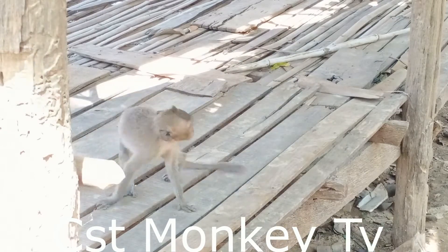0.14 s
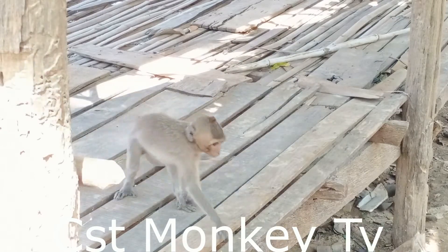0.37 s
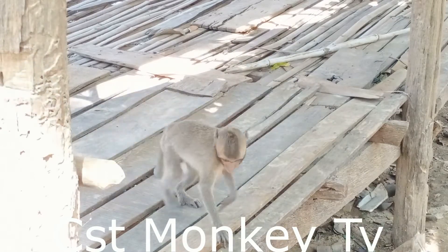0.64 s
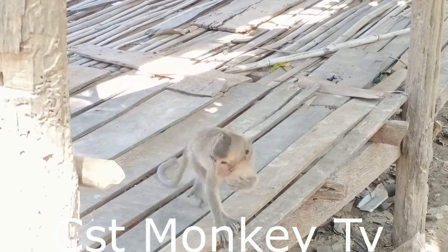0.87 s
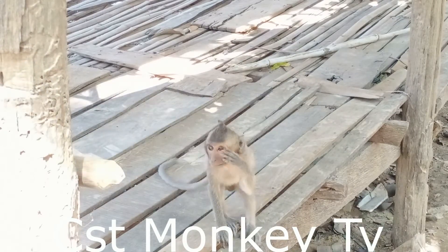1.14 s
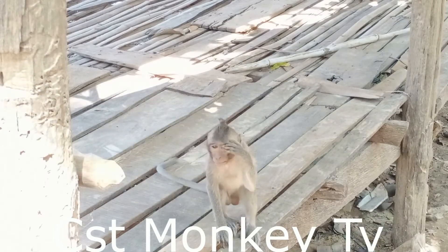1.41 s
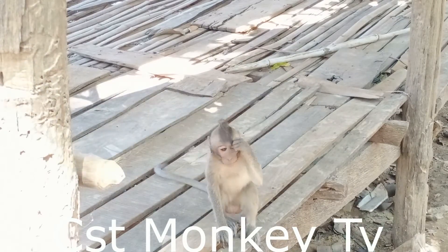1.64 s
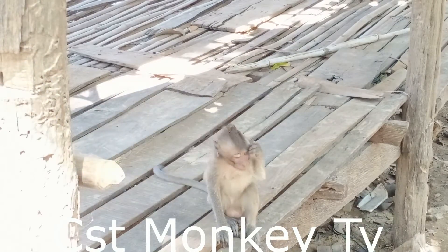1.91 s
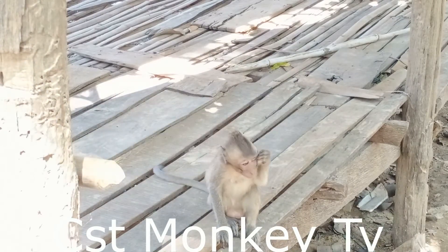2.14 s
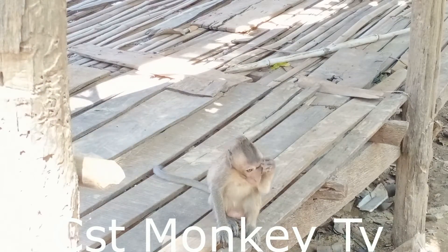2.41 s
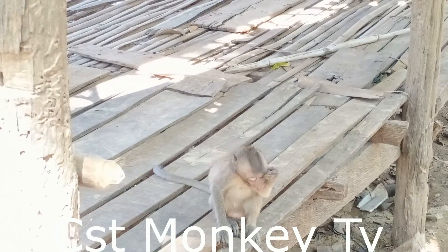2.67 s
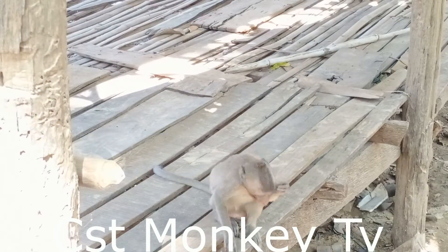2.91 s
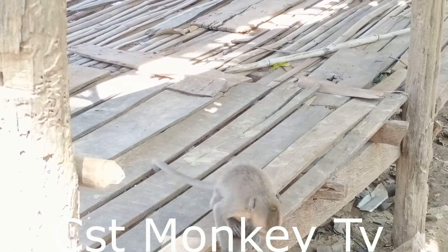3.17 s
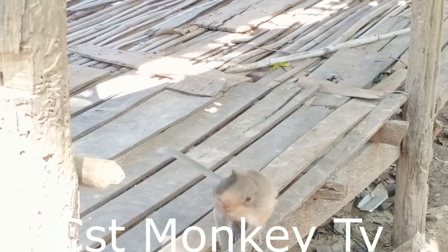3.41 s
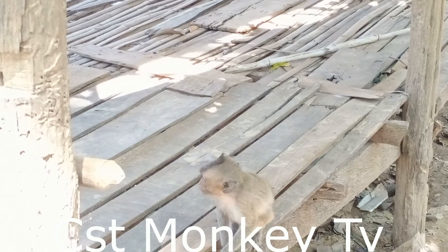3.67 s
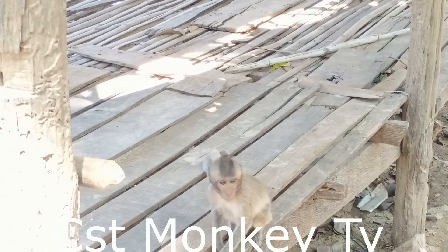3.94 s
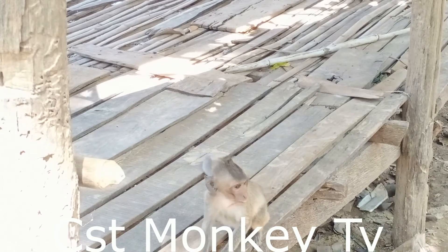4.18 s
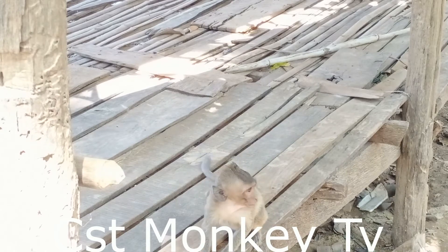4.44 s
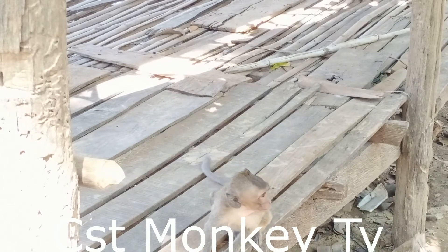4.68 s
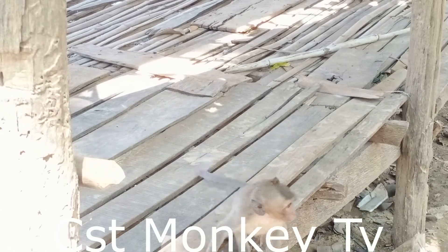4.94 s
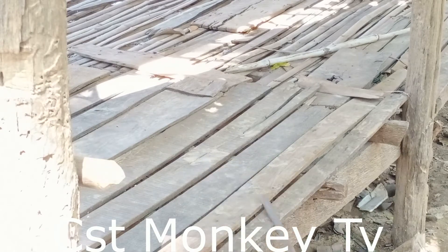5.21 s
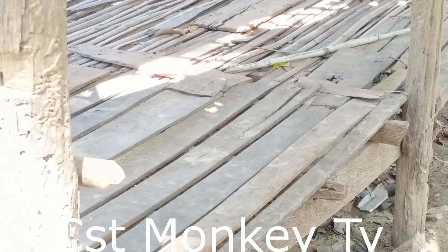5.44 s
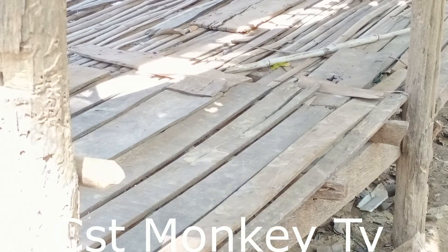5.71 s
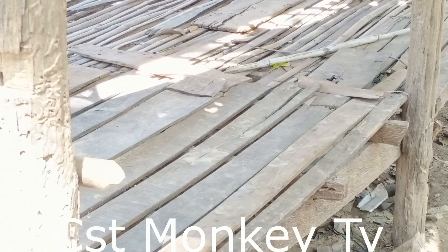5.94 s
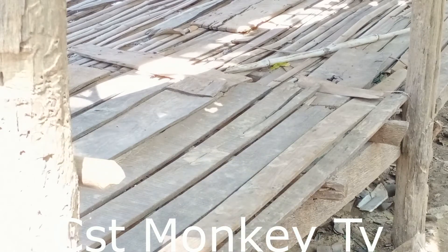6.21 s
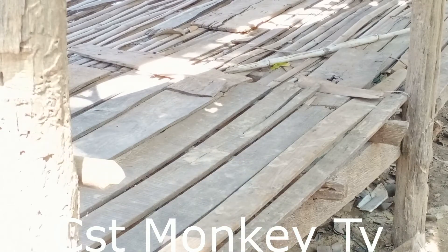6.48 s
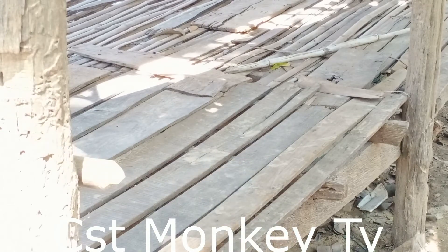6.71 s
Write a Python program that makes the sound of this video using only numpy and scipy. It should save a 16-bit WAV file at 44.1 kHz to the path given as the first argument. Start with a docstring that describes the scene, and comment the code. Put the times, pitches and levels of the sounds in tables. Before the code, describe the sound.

Light claws and fur brush over dry litter on wooden boards in uneven crackling bursts, mixed with short scrapes and small cracks. The middle is quieter and fidgety; a cluster of harder clicks and rocking boards follows at about five seconds, then sparse faint rustles. Dry open-air sound in mono, with soft wind rumble and slightly muted background hiss.

```python
"""A small monkey shuffles over loose, dry planks strewn with litter, under an open shed roof.
Claws and fur crackle as uneven noise bursts; scrapes and rocking boards are slips ringing tuned modes.
Taps are short cracks with a scattered tail and a board ring; light wind rumbles on the microphone
as lumpy low noise over a faint, steady outdoor hiss, and the recorder suppresses quiet bands."""
import sys
import numpy as np
from scipy import signal
from scipy.fft import rfft, irfft, next_fast_len
from scipy.io import wavfile
from scipy.ndimage import uniform_filter1d

SR = 44100
rng = np.random.default_rng(int(sys.argv[2]) if len(sys.argv) > 2 else 0)


def field_ratio(decibels):
    """Amplitude ratio for a level in dB (20 dB per decade); scalars and array-likes work."""
    return 10 ** (np.asarray(decibels, dtype=float) / 20)


def file_out(sig):
    """Save sig as 16-bit WAV at sys.argv[1]."""
    # one column per channel
    cols = np.atleast_2d(sig).T
    # limit, then scale
    lim = np.clip(cols, -1, 1)
    pcm = np.round(lim * 32767).astype(np.int16)
    wavfile.write(sys.argv[1], SR, pcm)


N = 301950

# Claws and fur moving over dry litter. Each row: start in seconds, length in seconds, crackle level in dB,
# treble against crackle in dB.
MOVES = [(0.0, 0.016, -50, -15), (0.038, .04, -55, -18), (0.078, 0.05, -43, -12), (0.16, 0.039, -52.5, -19),
         (0.222, 0.12, -49.5, -13.5), (0.412, 0.06, -52.5, -23), (0.49, 0.03, -45.5, -16.5),
         (0.546, 0.091, -54, -21), (0.651, 0.091, -53.5, -26), (0.857, 0.05, -67, -28),
         (0.936, .09, -54.5, -23), (1.014, 0.11, -51, -14), (1.143, 0.097, -56, -20),
         (1.29, 0.094, -47.5, -21), (1.411, 0.12, -48, -15.5), (1.654, 0.23, -49.5, -20.5),
         (1.981, 0.13, -50.5, -20), (2.13, 0.072, -49.5, -25), (2.266, 0.037, -48.5, -20),
         (2.334, 0.25, -46, -16.5), (2.699, 0.22, -48.5, -21.5), (2.972, 0.1, -49.5, -22),
         (3.097, .11, -50.5, -19), (3.321, 0.14, -48.5, -26), (3.568, 0.05, -48, -18),
         (3.63, .06, -58.5, -38), (3.845, 0.026, -55.5, -15), (3.934, 0.021, -49, -17.5),
         (3.996, 0.12, -51, -21), (4.108, 0.045, -51, -17), (4.176, 0.084, -55.5, -34),
         (4.414, 0.083, -51.5, -23), (4.53, 0.17, -50.5, -24), (4.733, 0.026, -51, -19),
         (4.915, 0.12, -49.5, -32), (4.994, 0.025, -43, -19), (5.08, 0.076, -46.5, -24),
         (5.2, 0.013, -36.5, -33), (5.206, 0.025, -44, -23), (5.251, 0.12, -46, -21),
         (5.431, .025, -49, -23), (5.463, 0.0071, -41.5, -9), (5.5, 0.13, -47.5, -16),
         (5.694, .36, -48.5, -23), (6.098, 0.13, -53, -19.5), (6.25, .16, -52, -21),
         (6.464, 0.17, -53.5, -21.5), (6.7, 0.04, -50, -18), (6.774, .1, -50, -20)]
MOVE_ATTACK_DB_PER_S, MOVE_SAG_DB_PER_S, MOVE_RELEASE_DB_PER_S = 797, 8, 244
REST_CRACKLE_DB, REST_TREBLE_REL_DB = -61, -30  # small stirrings between the moves
# Feet dragging on the boards. Each row: start in seconds, length in seconds, level in dB,
# pitch of the scraped spot in Hz.
SCRAPES = [(0.0, .05, -56.5, 1900), (0.07, 0.059, -47.5, 2200), (0.22, 0.021, -49.5, 1660),
           (0.26, 0.12, -56.5, 1100), (0.47, .06, -48.5, 1570), (0.55, .15, -55, 1100),
           (0.96, .17, -54.5, 1710), (1.29, 0.093, -50, 1770), (1.38, 0.045, -57, 1740),
           (1.47, 0.04, -54, 2210), (1.67, 0.036, -52.5, 1830), (1.76, 0.076, -53.5, 1530),
           (2.04, 0.12, -61.5, 1690), (2.135, 0.052, -55, 1640), (2.27, .06, -53, 2050),
           (2.43, .025, -43.5, 1640), (2.4, 0.027, -56, 1310), (2.48, 0.11, -53.5, 1440),
           (2.71, 0.23, -61.5, 1670), (3.03, .2, -67.5, 1410), (3.33, 0.11, -57.5, 1960),
           (3.54, 0.087, -57.5, 1260), (3.84, 0.01, -75, 2200), (3.92, 0.2, -60.5, 1730),
           (4.095, 0.038, -51.5, 1840), (4.42, 0.044, -62, 1660), (4.55, 0.094, -64, 2150),
           (4.73, 0.019, -59, 1730), (4.9, 0.099, -59, 1400), (5.0, 0.036, -52, 1420),
           (5.11, 0.036, -53.5, 1950), (5.195, 0.069, -46, 2450), (5.27, 0.085, -51, 1240),
           (5.433, 0.0057, -52.5, 2370), (5.468, 0.013, -45, 1640), (5.5, 0.066, -69, 1610),
           (5.595, 0.01, -56, 2660), (5.69, 0.036, -62.5, 1330), (5.93, 0.25, -63.5, 1770),
           (6.23, 0.0087, -61, 2940), (6.29, 0.23, -64, 1600), (6.715, 0.024, -53, 3200),
           (6.82, .05, -65.5, 2600)]
SCRAPE_ATTACK_DB_PER_S, SCRAPE_SAG_DB_PER_S, SCRAPE_RELEASE_DB_PER_S = 617, 30, 325
# Weight rocking a loose board. Each row: start in seconds, length in seconds, level in dB,
# pitch of the board in Hz.
ROCKS = [(0.48, 0.029, -73, 860), (0.64, 0.037, -73, 714), (1.32, 0.034, -61, 837), (1.46, .03, -85, 876),
         (2.0, 0.065, -70, 555), (2.25, 0.083, -67, 766), (2.43, 0.07, -63, 740), (3.55, 0.032, -66.5, 837),
         (3.61, 0.027, -60.5, 495), (3.645, 0.077, -66.5, 495), (4.095, .06, -67, 938),
         (4.91, 0.043, -62, 676), (5.005, 0.026, -53.5, 415), (5.06, 0.064, -58.5, 335),
         (5.155, .05, -60.5, 650), (5.21, .07, -62, 837), (5.29, 0.034, -54.5, 970),
         (5.34, 0.029, -52.5, 495), (5.37, 0.047, -53.5, 407), (5.44, 0.064, -57, 880),
         (6.72, 0.053, -64.5, 560)]
ROCK_ATTACK_DB_PER_S, ROCK_SAG_DB_PER_S, ROCK_RELEASE_DB_PER_S = 608, 36, 364
# Taps of claws and litter. Each row: start in seconds, relative level in dB, resonance of the crack in Hz,
# relative board ring in dB, pitch of the struck spot in Hz.
TAPS = [(0.0651, -38, 5300, -10, 1640), (0.084, -33.5, 5300, -5.5, 2920), (0.107, -25.5, 5570, -20, 2040),
        (0.2202, -24.5, 6200, -14.5, 1480), (0.2344, -26, 5530, -37, 2890),
        (0.2529, -29, 6260, -11.5, 1480), (0.3163, -30, 5800, -25, 1260), (0.4861, -33, 4700, -8, 2570),
        (0.6535, -31.5, 5000, -19.5, 1100), (1.28, -38.5, 4350, -29, 1730),
        (1.2985, -32, 5140, -11.5, 1620), (1.339, -34, 5630, -2, 1830), (1.4105, -27.5, 5600, -26, 1620),
        (1.474, -27.5, 4930, -17, 1850), (1.6188, -32, 6700, -32, 1370), (1.653, -50, 5300, -22, 1750),
        (1.6766, -30, 4550, -18, 1580), (1.864, -48.5, 5640, -6, 1360), (1.9772, -36.5, 5400, -27, 1330),
        (2.1387, -26, 4300, -33, 1640), (2.1871, -32.5, 3580, -42, 1470), (2.2486, -43, 6590, -11, 2070),
        (2.4114, -27, 3620, -30, 1380), (2.4341, -24, 3350, -9, 1770), (2.4897, -27.5, 5400, -17, 1330),
        (2.5333, -30, 3950, -15, 2680), (2.7036, -34, 4630, -27, 1680), (2.9153, -37, 4800, -18, 2850),
        (2.984, -43.5, 4600, -6, 2850), (3.1023, -38, 4860, -23, 2400), (3.3223, -38.5, 5900, -9, 1760),
        (3.5615, -36, 5800, -10, 1280), (3.612, -34, 5000, -29, 1300), (3.8442, -34, 4970, -15, 2150),
        (3.935, -30.5, 4170, -19.5, 1700), (4.0919, -21.5, 4150, -19, 1650),
        (4.2305, -35.5, 4600, -18.5, 1310), (4.5297, -36, 4470, -13, 2180), (4.62, -33, 4800, -16, 2280),
        (4.736, -29, 4550, -22.5, 1320), (4.9005, -27, 5330, -16, 1570), (5, -23, 6800, -19.5, 1360),
        (5.1244, -26.5, 3870, -12, 2570), (5.192, -24, 4000, -24, 2970), (5.196, -18, 3970, -20.5, 2280),
        (5.4317, -17.5, 3730, -11, 2480), (5.463, -23.5, 7100, -18, 1320), (5.471, -16.5, 3850, -18, 1380),
        (5.5984, -29.5, 6660, -15.5, 2640), (5.734, -45, 5750, -5.5, 1330), (5.9339, -32, 3900, -33, 1820),
        (6.2954, -34.5, 6900, -25, 1300), (6.6203, -35.5, 6900, -21, 1030), (6.6973, -26, 4400, -27, 1400),
        (6.7228, -32.5, 3400, -17, 1370)]
TAP_TAIL_DB = -8  # scattering litter against the crack, before the taps are coloured
# Nominal board modes. Each row: frequency in Hz, relative level in dB, t60 in seconds.
BOARD_MODES = [(224, -12.5, 0.066), (335, -4.5, 0.089), (407, -4.5, 0.038), (495, -2, 0.43), (555, -3, .15),
               (650, -7.5, 0.11), (740, 2, 0.076), (837, 1.5, 0.42), (938, -0.5, 0.12), (1100, -4.5, 0.18),
               (1226, -3, 0.039), (1313, 3.5, 0.058), (1480, -3, 0.078), (1640, -1.5, 0.097),
               (1850, -4, 0.022), (2099, -1, 0.038), (2308, -3.5, 0.078), (2570, 1.5, 0.037),
               (2850, 4.5, 0.13), (3055, 7.5, 0.02), (3400, 12, 0.031)]
# Puffs of wind on the microphone. Each row: start in seconds, length in seconds, level in dB.
PUFFS = [(0.0, .06, -67.5), (0.21, 0.11, -64), (0.51, 0.036, -72), (0.72, 0.14, -57.5), (1.1, 0.082, -61.5),
         (1.7, 0.15, -69), (2.14, 0.11, -68.5), (2.59, 0.12, -65.5), (2.87, 0.024, -75), (3.25, .15, -71.5),
         (3.65, 0.06, -60.5), (3.95, 0.086, -72), (4.19, .04, -69.5), (4.85, .05, -61.5),
         (5.42, 0.043, -57), (6.06, .13, -62.5)]
PUFF_ATTACK_DB_PER_S, PUFF_RELEASE_DB_PER_S, BREEZE_DB = 165, 210, -73
# Spectra of crackle, its treble, taps, wind and outdoor hiss. Each row: frequency in Hz,
# relative density in dB per Hz.
CRACKLE_SPECTRUM = [(1650, -26.5), (2800, -21.5), (3160, -12), (3950, 0.5), (5940, -1.5), (6780, -1.5),
                    (8750, -21), (9400, -57), (10500, -59), (13600, -70), (22000, -120)]
TREBLE_SPECTRUM = [(5880, -38), (10000, -9.5), (11400, -10.5), (12300, -1), (14900, 4.5), (16000, -30)]
TAP_SPECTRUM = [(1530, -29), (2600, -13), (3360, -10.5), (4180, -6), (6180, -7.5), (6860, -1.5),
                (9340, -29.5), (11800, -21.5), (14700, -13), (15700, 11)]
WIND_SPECTRUM = [(15, -68), (25, -26), (75, 5.5), (110, -1), (183, -20.5), (200, -46), (260, -89),
                 (440, -120)]
AIR_SPECTRUM = [(53, -41), (90, 1), (532, -12), (1290, -8.5), (2530, -15.5), (3290, -16), (4450, -2.5),
                (6580, 4.5), (8000, -9), (9310, -39), (12900, -30.5), (15000, -29), (16000, -32)]


def shuffle():
    """The same breaks give the crackle, its treble and the contact noise; slips drive the upper board modes."""
    moves = spells(MOVES, MOVE_ATTACK_DB_PER_S, MOVE_SAG_DB_PER_S, MOVE_RELEASE_DB_PER_S)
    treble_rel_db = np.array(MOVES)[:, 3:]
    crackle_gain = together(moves, REST_CRACKLE_DB)
    treble_gain = together(moves * field_ratio(treble_rel_db), REST_CRACKLE_DB + REST_TREBLE_REL_DB)
    grain = snaps(per_s=160, spread_db=2.0, t60_s=0.05, smooth=0.81)
    crackle = crackle_gain * colour(grain, CRACKLE_SPECTRUM)
    treble = treble_gain * colour(grain, TREBLE_SPECTRUM)

    drags = spells(SCRAPES, SCRAPE_ATTACK_DB_PER_S, SCRAPE_SAG_DB_PER_S, SCRAPE_RELEASE_DB_PER_S)
    drag_gain, pitch_hz = level_and_pitch(SCRAPES, drags, rest_db=-72)
    contact_band = signal.butter(4, [1020, 3700], "band", fs=SR, output="sos")
    contact = rms_one(signal.sosfilt(contact_band, grain))
    wood = board(pitch_hz, 0.27, 1000, 4000, per_s=15, spread_db=3.5, t60_s=0.066, smooth=0.27)
    scrape = contact + field_ratio(3) * evened(wood, span_s=0.07)
    return crackle + treble + drag_gain * rms_one(scrape)


def rocking():
    """Loose boards grind on their supports and sound the lower modes; all but silent between the spells."""
    rocks = spells(ROCKS, ROCK_ATTACK_DB_PER_S, ROCK_SAG_DB_PER_S, ROCK_RELEASE_DB_PER_S)
    gain, pitch_hz = level_and_pitch(ROCKS, rocks, rest_db=-100)
    wood = board(pitch_hz, 0.076, 200, 1050, per_s=39, spread_db=1.5, t60_s=0.092, smooth=0.91)
    return gain * evened(wood, span_s=0.043)


def taps():
    """Each tap: a crack of a few ms and a scattered tail, tinted by its own resonance, and a push on the board."""
    out = np.zeros(N + SR // 4)
    t = np.arange(SR // 4) / SR
    noise = rng.standard_normal((len(TAPS), 2, len(t)))
    crack = (1 - np.exp(-t / 0.0003)) * np.exp(-(t / 0.005) ** 3)
    scatter = (1 - np.exp(-t / 0.0076)) * field_ratio(-60 * t / 0.12)
    shape = crack + field_ratio(TAP_TAIL_DB) * scatter
    for (start_s, level_db, tint_hz, ring_db, pitch_hz), (white, push) in zip(TAPS, noise):
        broad = colour(white, TAP_SPECTRUM)
        tint = rms_one(signal.lfilter(*signal.iirpeak(tint_hz, 4.0, fs=SR), broad))
        burst = evened(broad + 0.5 * tint, span_s=0.013)
        wood = struck_board(shape * np.sign(push), pitch_hz, size=1 + 0.067 * np.tanh(push[0]))
        body = field_ratio(-6) * shape * burst + field_ratio(ring_db + 3) * wood
        at = round(start_s * SR)
        out[at:at + len(t)] += field_ratio(level_db) * body
    return signal.sosfilt(signal.butter(3, 800, "high", fs=SR, output="sos"), out[:N])


def struck_board(push, pitch_hz, size):
    """A push rings the modes, detuned by size as no two boards are tuned alike; peak 1."""
    wood = np.zeros(len(push))
    for hz, db, t60_s in BOARD_MODES:
        if hz > 900:  # claws are too light for the low modes
            gain = field_ratio(db) * nearness(hz, pitch_hz, 0.093)
            wood += gain * ring(push, size * hz, 0.61 * t60_s)
    return wood / np.abs(wood).max()


def board(pitch_hz, reach_octaves, lowest_hz, highest_hz, **grain):
    """Modes near the pitch of the touched spot ring most; each mode meets its own slips."""
    wood = np.zeros(N)
    for hz, db, t60_s in BOARD_MODES:
        if lowest_hz < hz < highest_hz:
            gain = field_ratio(db) * nearness(hz, pitch_hz, reach_octaves)
            wood += gain * rms_one(ring(snaps(**grain), hz, t60_s))
    return wood


def nearness(hz, pitch_hz, reach_octaves):
    """How strongly a touched spot drives a mode; far modes keep a floor of 0.21."""
    octaves = np.log2(hz / pitch_hz)
    return np.exp(-0.5 * (octaves / reach_octaves) ** 2) + 0.21


def ring(push, hz, t60_s):
    """Two-pole resonator: a unit click sets a decaying sine of starting height 1 ringing."""
    r, w = field_ratio(-60 / (t60_s * SR)), 2 * np.pi * hz / SR
    return signal.lfilter([0, np.sin(w)], [1, -2 * r * np.cos(w), r * r], push + 1e-18)


def snaps(per_s, spread_db, t60_s, smooth):
    """Random tiny breaks of uneven size, each a noise burst dying away, over a share of smooth friction."""
    heights = field_ratio(spread_db * np.minimum(rng.exponential(1, N), 3))
    breaks = heights * (rng.random(N) < per_s / SR)
    power = signal.lfilter([1], [1, -field_ratio(-120 / (t60_s * SR))], breaks ** 2 + 1e-18)
    envelope = np.sqrt(power / power.mean() + smooth)
    return evened(envelope * rng.standard_normal(N), span_s=0.093)


def spells(rows, attack_db_per_s, sag_db_per_s, release_db_per_s):
    """Gain of each row on a 1 ms grid: rises up to its start, sags while held, then falls away."""
    start_s, length_s, db = np.transpose(rows)[:3, :, None]
    since_s = np.arange(0, N / SR + 0.002, 0.001) - start_s
    rise = attack_db_per_s * np.maximum(-since_s, 0)
    sag = sag_db_per_s * np.clip(since_s, 0, length_s)
    fall = release_db_per_s * np.maximum(since_s - length_s, 0)
    return field_ratio(np.maximum(db - (rise + sag + fall), -200))


def together(gains, rest_db):
    """Power sum of the rows over a resting level, one value per sample."""
    total = np.sqrt(np.sum(gains ** 2, axis=0) + field_ratio(rest_db) ** 2)
    return np.interp(np.arange(N) / SR, np.arange(len(total)) / 1000, total)


def level_and_pitch(rows, gains, rest_db):
    """Gain and pitch over time; the loudest row sets the pitch."""
    hz = np.array(rows)[np.argmax(gains, axis=0), 3]
    ms = (np.arange(N) * 1000 / SR).astype(int)
    return together(gains, rest_db), hz[ms]


def rms_one(x):
    """Scales to rms 1."""
    return x / np.sqrt(np.mean(x ** 2) + 1e-20)


def evened(x, span_s):
    """Divides out the slow level, so that only the fine grain is left."""
    return x / np.sqrt(uniform_filter1d(x ** 2, int(span_s * SR)) + 1e-12)


def colour(x, spectrum):
    """Shapes a signal by a spectrum read on a log-frequency axis; rms 1."""
    size = next_fast_len(len(x))
    hz = np.maximum(np.arange(size // 2 + 1) * SR / size, 1)
    point_hz, point_db = np.array(spectrum).T
    gain = field_ratio(np.interp(np.log(hz), np.log(point_hz), point_db))
    return rms_one(irfft(rfft(x, size) * gain, size)[:len(x)])


def wind():
    """Lumpy low noise on the microphone: a breeze with puffs."""
    puffs = spells(PUFFS, PUFF_ATTACK_DB_PER_S, 0, PUFF_RELEASE_DB_PER_S)
    rumble = colour(rng.standard_normal(N), WIND_SPECTRUM)
    return together(puffs, BREEZE_DB) * evened(rumble, span_s=0.074)


def outdoor_air():
    """Faint outdoor hiss: steady coloured noise."""
    return field_ratio(-54) * colour(rng.standard_normal(N), AIR_SPECTRUM)


def scene():
    """All sources, one channel."""
    mix = shuffle() + rocking() + taps() + wind() + outdoor_air()
    return mix[None]


def suppress(x, over_db, most_db, from_hz):
    """Noise suppressor: a band near its own quiet level is turned down, frame by frame."""
    hz, _, z = signal.stft(x, SR, nperseg=1024)
    power = uniform_filter1d(np.abs(z) ** 2, size=5, axis=0)  # over bands
    power = uniform_filter1d(power, size=3, axis=1) + 1e-20  # over frames
    quiet = np.percentile(power, 20, axis=1, keepdims=True)
    gain = np.clip(1 - field_ratio(over_db) * quiet / power, field_ratio(most_db), 1)
    gain[hz < from_hz] = 1
    return signal.istft(z * gain, SR, nperseg=1024)[1][:N]


def roll_off(x):
    """The treble ends steeply here."""
    return signal.sosfilt(signal.butter(12, 16590, fs=SR, output="sos"), x)


def record(dry):
    """Noise suppressor, then a steep 15.9 kHz band limit."""
    clean = suppress(dry[0], over_db=-6, most_db=-9, from_hz=300)
    band_limit = signal.cheby2(12, 60, 15900, fs=SR, output="sos")
    mix = signal.sosfilt(band_limit, clean)[None]
    return roll_off(mix)


dry = scene()
out = record(dry)
file_out(out)
```